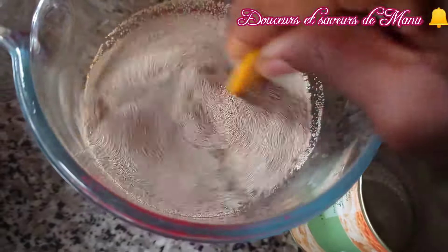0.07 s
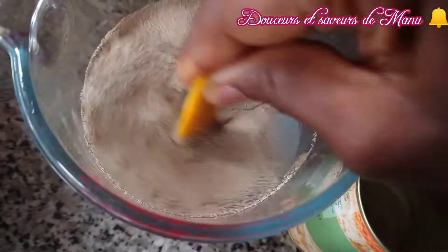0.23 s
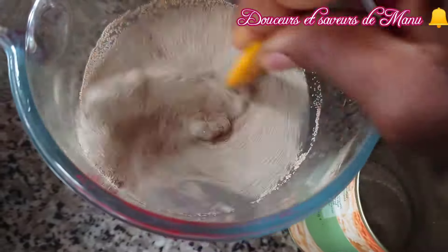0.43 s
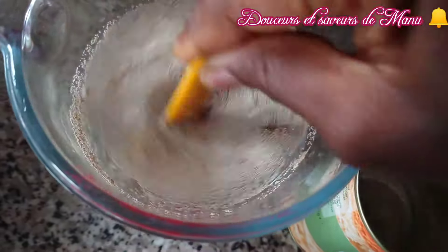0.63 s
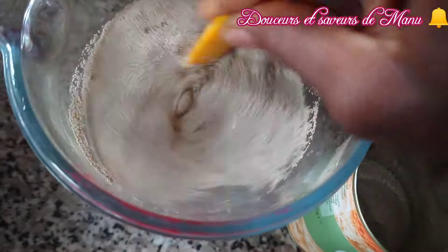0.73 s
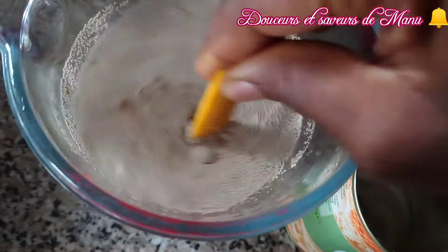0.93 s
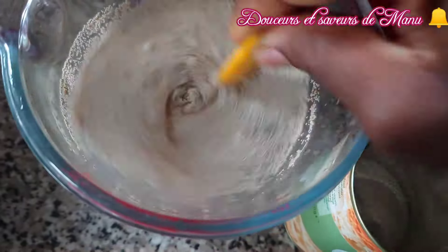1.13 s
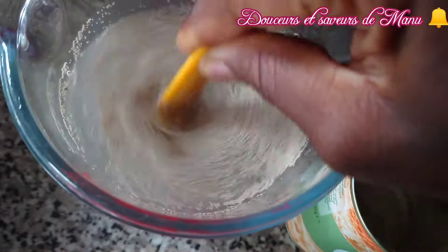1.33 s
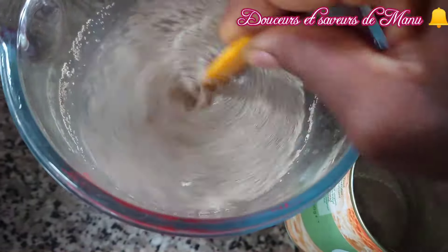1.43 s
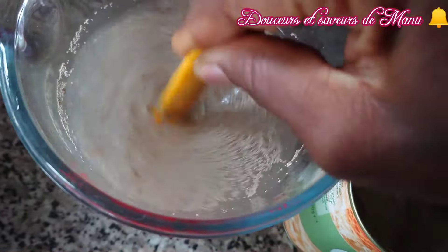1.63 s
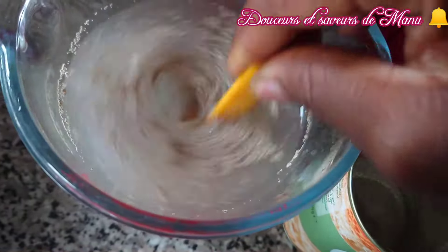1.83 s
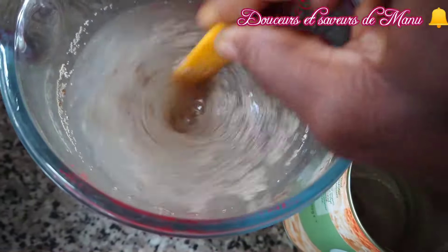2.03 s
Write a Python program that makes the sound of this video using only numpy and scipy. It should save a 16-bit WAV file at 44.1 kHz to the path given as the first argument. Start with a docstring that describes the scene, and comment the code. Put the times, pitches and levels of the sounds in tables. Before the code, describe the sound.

A spatula stirring water in a glass jug, knocking and scraping over gritty sugar.

```python
"""Stirring sugar water in a glass jug

A spatula stirs sugary water in a glass jug on a stone counter, close to a two-port microphone.
The blade knocks and drags on the wet glass, which rings dully, and trapped air plops at each knock.
Grains crunch under the blade in bright bursts; the jug thuds on the counter and the water swirls."""
import sys
import numpy as np
from scipy import signal
from scipy.io import wavfile

SR = 44100
rng = np.random.default_rng(int(sys.argv[2]) if len(sys.argv) > 2 else 0)


def file_out(sig):
    """Save sig as 16-bit WAV at sys.argv[1]."""
    # one column per channel
    cols = np.atleast_2d(sig).T
    # limit, then scale
    lim = np.clip(cols, -1, 1)
    pcm = np.round(lim * 32767).astype(np.int16)
    wavfile.write(sys.argv[1], SR, pcm)


N = 92080
TIME_S = np.arange(N) / SR
PORT_LAG_S = 0.00022  # the right port hears later
DRAG_GRAINS_PER_S = 1500


def amp(db):
    return 10 ** (np.asarray(db) / 20)


def rms_one(x):
    return x / np.sqrt(np.mean(x ** 2) + 1e-20)


def band(x, low_hz, high_hz):
    sos = signal.butter(2, [low_hz, min(high_hz, .45 * SR)], "band", fs=SR, output="sos")
    return signal.sosfilt(sos, x)


def drift(steps_per_s):
    """Slow random wander, rms 1."""
    steps = rng.standard_normal(int(N / SR * 40) + 3)
    return rms_one(np.interp(TIME_S * steps_per_s, np.arange(len(steps)), steps))


def grit(per_s, spread_db):
    """Random clicks of uneven size, rms 1."""
    sizes = amp(spread_db * np.minimum(rng.exponential(1, N), 4)) * rng.choice([-1, 1], N)
    return rms_one(sizes * (rng.random(N) < per_s / SR))


def contacts(start_s, length_s, per_s, first_click, attack_s=0.00097):
    """One unit-energy row per contact: a first click, then chatter that dies over the contact length."""
    age = TIME_S - start_s[:, None]
    attack = 1 - np.exp(-np.clip(age, 0, 1) / attack_s)
    decay = np.exp(-np.abs(age) / length_s[:, None])
    hits = grit(per_s, spread_db=2.23) * attack * decay
    onsets = np.ceil(start_s * SR).astype(int)
    hits[np.arange(len(start_s)), onsets] += first_click * np.sqrt(SR / per_s)
    return hits / np.sqrt(np.sum(hits ** 2, axis=1, keepdims=True))


def favour(hz, centre_hz, spread_oct, depth_db=20):
    """A contact excites pitches near its own more strongly."""
    nearness = np.exp(-.5 * (np.log2(hz / centre_hz) / spread_oct) ** 2)
    return amp(depth_db * (nearness - .5))


def ring(clicks, hz, t60_s):
    """One mode: each click starts a dying sine."""
    r, w = amp(-60 / (t60_s * SR)), 2 * np.pi * hz / SR
    return signal.lfilter([0, np.sin(w)], [1, -2 * r * np.cos(w), r * r], clicks + 1e-18)


def ports(x, pan_db, late=True):
    """Left and right microphone ports; a positive pan leans left."""
    samples = np.arange(N)
    right = np.interp(samples - PORT_LAG_S * SR * late, samples, x)
    return np.array([x * amp(pan_db / 2), right * amp(-pan_db / 2)])


def noise_bank(spectrum, excite, bands, flicker_db, shared):
    """Noise partly shared by the ports, in bands that follow a spectrum and flicker on their own."""
    hz, db = np.transpose(spectrum)
    drive = np.sqrt(shared) * ports(excite(), 0) + np.sqrt(1 - shared) * np.array([excite(), excite()])
    edges, out = np.geomspace(hz[0], hz[-1], bands + 1), 0
    for k, (low, high) in enumerate(zip(edges, edges[1:])):
        band_db = np.interp(np.log(low * high) / 2, np.log(hz), db) + flicker_db * drift(15)
        out = out + (-1) ** k * amp(band_db) * band(drive, low, high)
    return rms_one(out)


def room(x, t60_s=0.15, level_db=-15, wall_cut_hz=6700):
    """The walls return a short wash of reflections, different at each port."""
    age = np.arange(int(.3 * SR)) / SR
    tail = rng.standard_normal((2, len(age))) * amp(-60 * age / t60_s) * (age > .003)
    tail = band(tail, 36, wall_cut_hz)
    tail /= np.sqrt(np.sum(tail ** 2, axis=1, keepdims=True))
    return amp(level_db) * signal.fftconvolve(x, tail, axes=1)[:, :N]


# Rumble of the water in the jug, a little to the right: frequency_hz, relative_db
SWIRL_SPECTRUM = [(22, -28), (45, 1.5), (70, -1.5), (177, -10.5), (300, -15.5)]
def swirl(ring_db, level_db=-62):
    """Swirling water rumbles, swelling as the blade drags harder."""
    slosh_db = level_db + 0.98 * (ring_db - ring_db.mean())
    port_db = np.array([[-2.2], [2.2]])
    rumble = noise_bank(SWIRL_SPECTRUM, lambda: rng.standard_normal(N), 6, flicker_db=0.5, shared=0.83)
    return amp(slosh_db + port_db) * rumble


# Hiss of the blade on wet glass, wide across both ports: frequency_hz, relative_db
HISS_SPECTRUM = [(350, -9.5), (581, -16.5), (1130, -9.5), (1350, -18.5), (2320, -22.5), (5910, -19.5),
                 (8060, -29), (14800, -18.5), (16500, -34)]
def drag_hiss(hiss_db, flicker_db=2.5):
    """The dragging blade makes a spray of tiny clicks, heard as a flickering hiss."""
    level = amp(hiss_db + flicker_db * drift(34.8))
    return level * noise_bank(HISS_SPECTRUM, lambda: grit(3500, 4.5), 12, flicker_db=4, shared=0.25)


# Thuds on the stone counter and gulps of water, right of centre: start_s, level_db, pitch_hz
COUNTER_THUDS = [(0.03, -46.5, 100), (0.117, -49, 43.6), (0.253, -47, 74.5), (0.326, -48.5, 76),
                 (0.42, -45.5, 98), (0.551, -50.5, 98), (0.591, -53, 55), (.64, -47.5, 152),
                 (0.771, -44, 57.5), (0.916, -53, 49), (1.124, -50, 61.4), (1.136, -34.5, 229),
                 (1.236, -55, 51), (1.296, -53, 56), (1.439, -45, 92), (1.595, -48, 52),
                 (1.763, -40.5, 49.3), (1.948, -46, 47.8)]
def thuds(trim_db=4.5, t60_cycles=6.8):
    """Each thud is one push that rings for a few low cycles."""
    out = np.zeros(N)
    for start_s, level_db, pitch_hz in COUNTER_THUDS:
        push = np.zeros(N)
        push[int(start_s * SR)] = amp(level_db + trim_db)
        out += ring(push, pitch_hz, t60_cycles / pitch_hz)
    return ports(band(out, 36, 238), pan_db=-3.5, late=False)


# Strength of the blade's drag along the glass: time_s, ring_db, hiss_db
BLADE_DRAG = [(0, -58.5, -56.5), (0.151, -53.5, -59), (.23, -67, -61.5), (.39, -61, -67),
              (0.519, -58.5, -58.5), (.65, -54.5, -56.5), (.74, -60, -62), (.86, -63.5, -59),
              (.95, -59.5, -54), (1.1, -58.5, -64), (1.25, -52, -62), (1.419, -69, -72),
              (1.5, -54.5, -65.5), (1.679, -63, -65.5), (1.8, -52.5, -61.5), (2.09, -58.5, -71.5)]
def drag_levels():
    """The drag swells and eases through the stir: one level curve for ringing, one for hiss."""
    time_s, ring_db, hiss_db = np.transpose(BLADE_DRAG)
    return np.interp(TIME_S, time_s, ring_db), np.interp(TIME_S, time_s, hiss_db)


def jug(modes, hits, gains, friction, hit_hz=None, friction_hz=None, late=True):
    """Contacts, each striking the modes unevenly, and continuous friction set the glass ringing."""
    out, norm = 0, np.sqrt(np.sum(amp(np.array(modes)[:, 1]) ** 2))
    uneven_db = 3 * rng.uniform(-0.79, 1, (len(hits), len(modes)))
    for k, (hz, db, t60_s, pan_db) in enumerate(modes):
        hit_tilt = 1 if hit_hz is None else favour(hz, hit_hz, spread_oct=0.43)
        rub_tilt = 1 if friction_hz is None else favour(hz, friction_hz, spread_oct=0.2)
        struck = (gains * hit_tilt * amp(uneven_db[:, k])) @ hits
        rubbed = friction * rub_tilt / np.sqrt(t60_s * SR / 28)  # offsets build-up in long modes
        mode = (-1) ** k * amp(db) / norm * ring(struck + rubbed, hz, t60_s)
        out = out + ports(mode, pan_db, late)
    return out


# Upper modes of the water-filled jug: pitch_hz, relative_db, t60_s, pan_db
HIGH_MODES = [(2480, -1, 0.009, 3), (3320, 1, 0.014, -1), (5720, -4, 0.018, 2), (6041, 3, 0.03, 1.5),
              (6760, -7, 0.03, -5)]
# Sugar under the blade, close up: start_s, spray_db, body_db, spray_hz, ring_hz, length_s
SUGAR_CRUNCHES = [(0.046, -32.5, -46, 12180, 6600, 0.0038), (0.098, -33, -48.5, 15600, 6060, 0.017),
                  (0.152, -42.5, -67, 10200, 5780, 0.0032), (0.1658, -37, -51.5, 10200, 5960, 0.0041),
                  (0.249, -52.5, -59, 10200, 5900, 0.0051), (0.294, -53, -57, 13800, 4080, 0.0033),
                  (0.417, -47.5, -62, 8300, 5750, 0.0041), (0.428, -49, -62, 12300, 5760, 0.0026),
                  (0.485, -32.5, -49, 15600, 5160, 0.0094), (0.512, -39, -49.5, 13500, 6040, 0.0065),
                  (0.5447, -17.5, -42, 16200, 6050, 0.0033), (0.5973, -34, -66, 10400, 3530, 0.0039),
                  (0.6047, -25, -54, 10500, 5700, 0.0045), (0.6116, -29.5, -47.5, 10500, 5760, 0.0029),
                  (0.652, -35.5, -54, 14300, 6070, 0.016), (0.71, -49, -53, 14300, 2450, 0.0022),
                  (0.759, -46, -55, 10500, 2380, 0.0072), (0.771, -38, -45.5, 13400, 2200, 0.003),
                  (0.818, -57, -50, 9700, 2320, 0.0041), (0.8305, -37, -52.5, 10200, 2400, 0.0046),
                  (0.8738, -38, -50, 14000, 3330, 0.0066), (0.895, -30.5, -44.5, 10300, 3380, 0.0027),
                  (0.9175, -28.5, -44.5, 15400, 6040, 0.0027), (0.964, -33, -48, 8900, 7100, 0.0016),
                  (0.995, -41, -49, 9900, 2490, 0.0017), (1.0106, -55, -54.5, 14300, 2460, 0.0019),
                  (1.046, -41, -53, 13800, 4950, 0.0068), (1.12, -35.5, -51.5, 12600, 3580, 0.0012),
                  (1.135, -38, -50.5, 14500, 4800, 0.002), (1.1826, -47, -59, 14800, 2170, 0.0012),
                  (1.217, -44, -53, 10300, 2530, 0.0081), (1.236, -37, -52, 13000, 3340, 0.0037),
                  (1.249, -41, -53, 10100, 3570, 0.0099), (1.3843, -33.5, -64, 13300, 3300, 0.0012),
                  (1.438, -31, -55, 12470, 5460, 0.0048), (1.467, -43, -57, 11000, 2940, 0.0099),
                  (1.51, -48, -60.5, 8800, 2280, 0.002), (1.5664, -52.5, -55, 9200, 4000, 0.0022),
                  (1.6165, -54, -52, 12400, 3000, 0.008), (1.657, -57, -57.5, 12000, 3360, 0.012),
                  (1.6984, -40, -54, 14300, 3820, 0.0041), (1.7064, -32.5, -49, 13800, 2440, 0.0047),
                  (1.737, -38, -61, 13600, 2460, 0.0064), (1.7564, -41, -51, 13700, 2150, 0.0089),
                  (1.78, -35.5, -48.5, 13300, 2170, 0.0038), (1.834, -48, -52.5, 14700, 2210, 0.002),
                  (1.861, -47, -58, 13800, 2290, 0.0092), (1.891, -37.5, -47.5, 14100, 5000, 0.02),
                  (1.9203, -46, -48, 14200, 4330, 0.0024), (2.013, -49.5, -54.5, 14800, 3380, 0.00064),
                  (2.034, -49, -53.5, 14600, 3960, 0.0085), (2.049, -42.5, -59.5, 13600, 3730, 0.015)]
def crunches(hiss_db, grains_per_s=5000, ring_trim_db=5, snap_trim_db=27, spray_trim_db=16.5):
    """Grains break in dense bursts: upper jug modes, a snap and a bright spray, different at each port."""
    start_s, spray_db, body_db, spray_hz, ring_hz, length_s = np.transpose(SUGAR_CRUNCHES)
    left = contacts(start_s, length_s, grains_per_s, first_click=0.58)
    right = 0.11 * left + 0.8 * contacts(start_s + PORT_LAG_S, length_s, grains_per_s, first_click=0.47)
    friction = amp(hiss_db - 12) * grit(DRAG_GRAINS_PER_S, spread_db=4.9)
    out = jug(HIGH_MODES, left, amp(body_db + ring_trim_db), friction, ring_hz)
    snap = np.array([amp(body_db + snap_trim_db) @ side for side in (left, right)])
    out += band(snap, 980, 7800)
    edges_hz = np.geomspace(8500, 17000, 7)
    for low, high in zip(edges_hz, edges_hz[1:]):
        gains = amp(spray_db + spray_trim_db) * favour(np.sqrt(low * high), spray_hz, spread_oct=0.18)
        spray = np.array([amp(2.5) * gains @ left, amp(-2.5) * gains @ right])  # leans left
        out += band(spray, low, high)
    return out


def plops(start_s, level_db, pitch_hz, length_s, trim_db=-1, rise_per_s=3.54):
    """Air trapped at the blade rings as a clear, slightly rising tone that swells and dies."""
    age = np.clip(TIME_S - start_s[:, None], 0, None)
    rise = 1 + rise_per_s * np.minimum(age, .05)
    tone = np.sin(2 * np.pi * pitch_hz[:, None] * age * rise)
    swell = age / (0.45 * length_s[:, None])  # loudest where this reaches 1
    return ports(amp(level_db + trim_db) @ (tone * swell * np.exp(1 - swell)), pan_db=0.9)


# Low and middle modes of the water-filled jug: pitch_hz, relative_db, t60_s, pan_db
LOW_MODES = [(227.6, -10, 0.078, -1.5), (309, -2.5, 0.078, -3.5), (341.7, -0.5, 0.11, -8.5),
             (409, -5.5, 0.054, -6.5), (528, -12, 0.064, 0), (683, -14, 0.047, -12)]
MID_MODES = [(852, -6, 0.063, 1.8), (977, -1.5, 0.025, 0.61), (1128.4, -3, 0.043, 3.8),
             (1233, -4, 0.026, 0.8), (1500, 2, 0.0086, 12), (2000, -7.5, 0.016, 5), (1695, 4.5, 0.028, 1.2),
             (2310, -2, 0.08, 6.3)]
# Blade knocks on the glass, close to the microphone: start_s, mid_db, low_db, pitch_hz, length_s
BLADE_KNOCKS = [(0.003, -45, -45.5, 1093, 0.0091), (0.046, -60, -45.5, 910, 0.0021),
                (0.099, -46, -54, 916, 0.01), (0.249, -47, -50.5, 1040, 0.0043),
                (0.264, -48, -50, 1125, 0.011), (0.292, -45.5, -64, 1230, 0.012),
                (0.32, -43, -63, 1018, 0.003), (0.333, -57, -50, 1004, 0.0084),
                (0.411, -44.5, -71, 1230, 0.0032), (0.422, -45, -46, 1100, 0.0085),
                (0.49, -43, -67, 1237, 0.004), (0.516, -40.5, -62, 1163, 0.0053),
                (0.534, -44, -59, 1370, 0.0053), (0.553, -43, -50.5, 970, 0.005),
                (0.616, -40.5, -58, 1290, 0.0019), (0.671, -53.5, -68, 1070, 0.0025),
                (0.711, -50, -66, 1140, 0.005), (0.759, -52, -56.5, 1130, 0.0072),
                (0.7724, -38, -53.5, 1335, 0.0034), (0.82, -48, -65, 1520, 0.0028),
                (0.873, -58, -62, 820, 0.0059), (0.89, -36.5, -47, 984, 0.0037),
                (0.8972, -40.5, -44.5, 866, 0.0035), (0.924, -60, -43.5, 1137, 0.026),
                (0.928, -46, -47, 924, 0.013), (0.953, -42, -53.5, 1080, 0.0024),
                (0.962, -32.5, -51, 1042, 0.0076), (0.992, -37, -59, 1040, 0.004),
                (1.044, -52.5, -52, 1015, 0.017), (1.12, -43.5, -49.5, 1170, 0.009),
                (1.139, -46.5, -44.5, 976, 0.006), (1.236, -41, -57.5, 1080, 0.0022),
                (1.379, -54.5, -93, 1010, 0.011), (1.4416, -31.5, -43, 995, 0.005),
                (1.47, -49.5, -51.5, 1091, 0.012), (1.557, -47.5, -51.5, 1236, 0.0067),
                (1.597, -43, -47.5, 1140, 0.0025), (1.62, -43.5, -49.5, 1110, 0.0014),
                (1.705, -34, -63, 1180, 0.0075), (1.715, -27.5, -56, 1155, 0.0065),
                (1.738, -44, -66, 1150, 0.005), (1.757, -35, -45, 1210, 0.0032),
                (1.771, -43, -40, 1210, 0.0053), (1.782, -38, -55, 970, 0.0041),
                (1.817, -44, -55, 960, 0.0042), (1.833, -36, -57, 984, 0.0035),
                (1.889, -38, -45.5, 1180, 0.003), (1.921, -42, -55, 1130, 0.0032),
                (1.947, -39, -42, 1200, 0.005), (1.996, -49, -62, 1037, 0.0047),
                (2.033, -45.5, -79, 1110, 0.007), (2.064, -38.5, -69, 1230, 0.0048)]
def blade_on_glass(ring_db, low_trim_db=4, mid_trim_db=-4, tap_trim_db=11):
    """Knocks and drag ring the jug's low and middle modes; each knock adds a broad tap and a plop."""
    start_s, mid_db, low_db, pitch_hz, length_s = np.transpose(BLADE_KNOCKS)
    hits = contacts(start_s, length_s, per_s=730, first_click=1.05)
    drag = amp(ring_db + 3 * drift(30))
    low_friction = amp(-5.5) * drag * grit(DRAG_GRAINS_PER_S, spread_db=1.0)
    low = jug(LOW_MODES, hits, amp(low_db + low_trim_db), low_friction, late=False)
    mid_friction = amp(-7) * drag * grit(DRAG_GRAINS_PER_S, spread_db=5.3)
    mid = jug(MID_MODES, hits, amp(mid_db + mid_trim_db), mid_friction, pitch_hz, friction_hz=1120)
    tap = ports(band(amp(mid_db + tap_trim_db) @ hits, 750, 3500), pan_db=1.3)
    return low + mid + tap + plops(start_s, mid_db, pitch_hz, length_s)


def scene():
    """Blade and sugar up close with a little room, over hiss, swirl and thuds."""
    ring_db, hiss_db = drag_levels()
    near = blade_on_glass(ring_db) + crunches(hiss_db)
    return near + room(near) + drag_hiss(hiss_db) + swirl(ring_db) + thuds()


def record(dry, rolloff_hz=15900, cutoff_hz=17000):
    """The top treble rolls off, then is cut steeply."""
    soft = signal.sosfilt(signal.butter(6, rolloff_hz, fs=SR, output="sos"), dry)
    return signal.sosfilt(signal.cheby2(12, 70, cutoff_hz, fs=SR, output="sos"), soft)


dry = scene()
out = record(dry)
file_out(out)
```